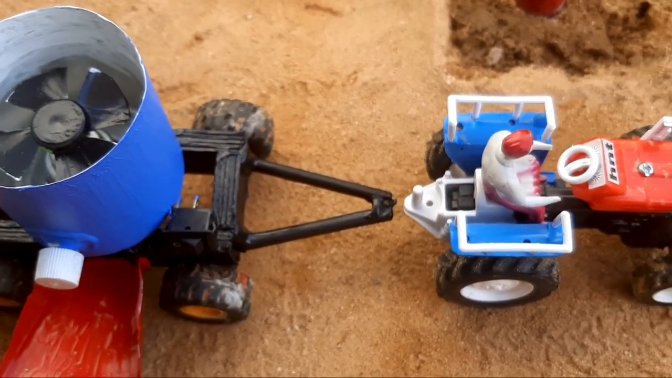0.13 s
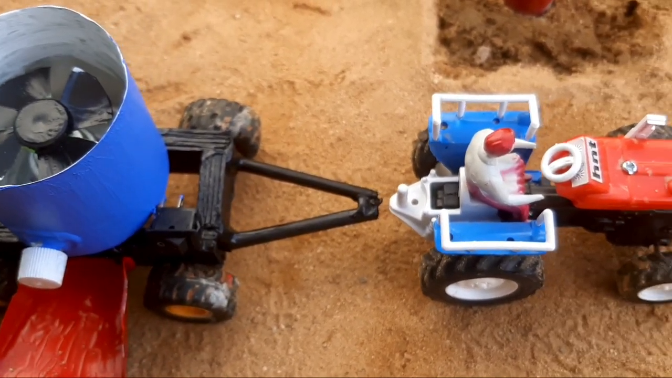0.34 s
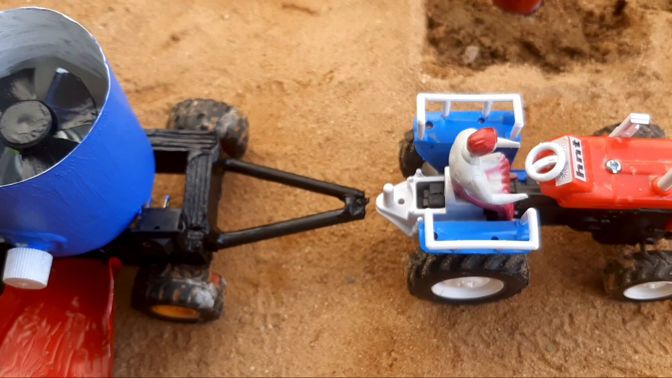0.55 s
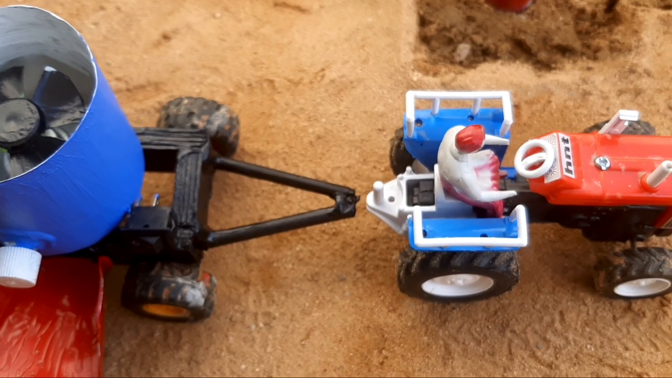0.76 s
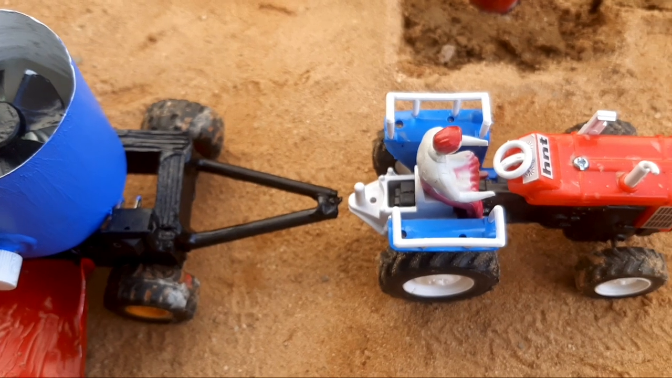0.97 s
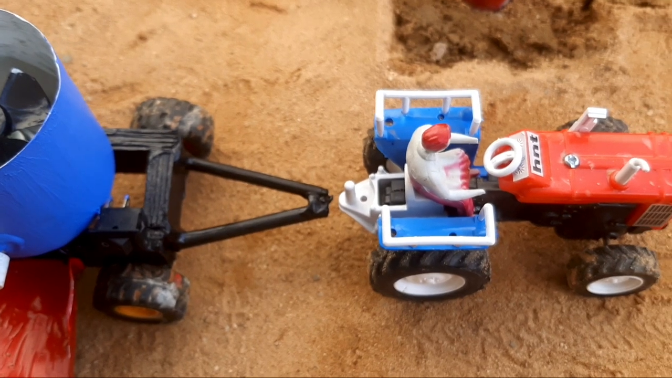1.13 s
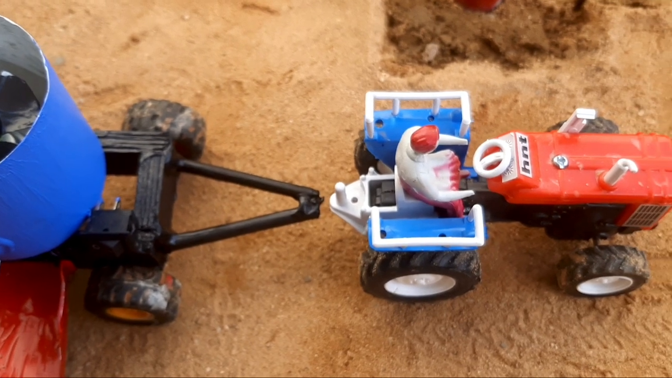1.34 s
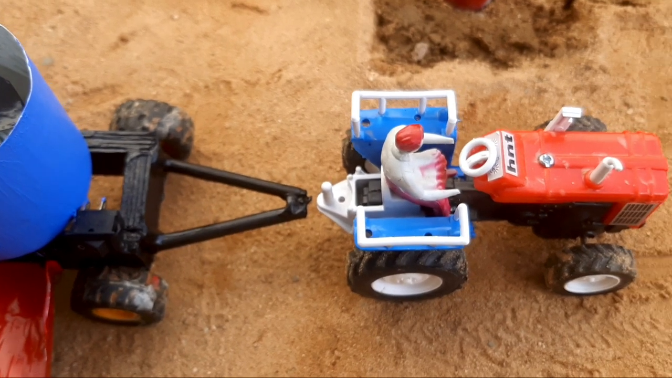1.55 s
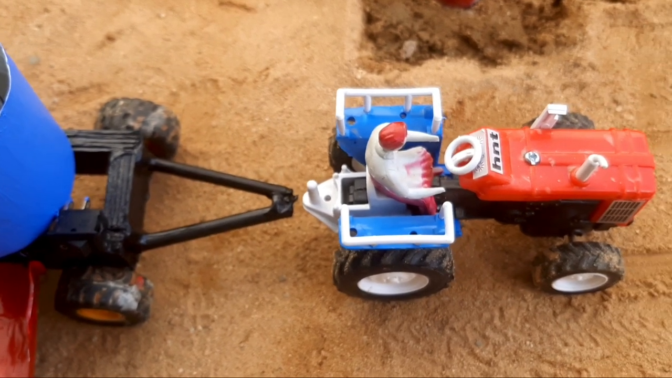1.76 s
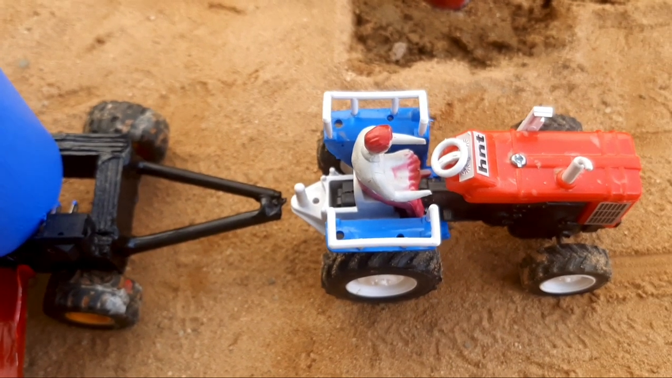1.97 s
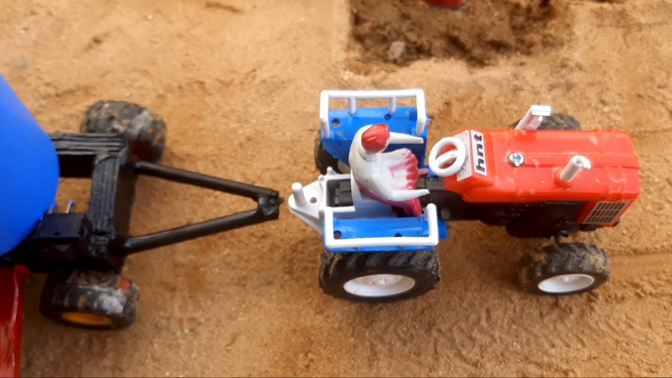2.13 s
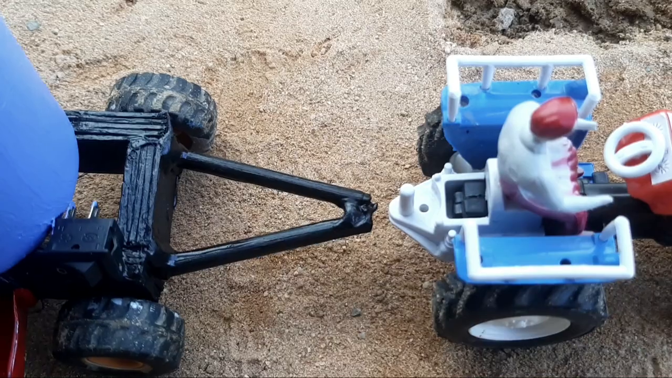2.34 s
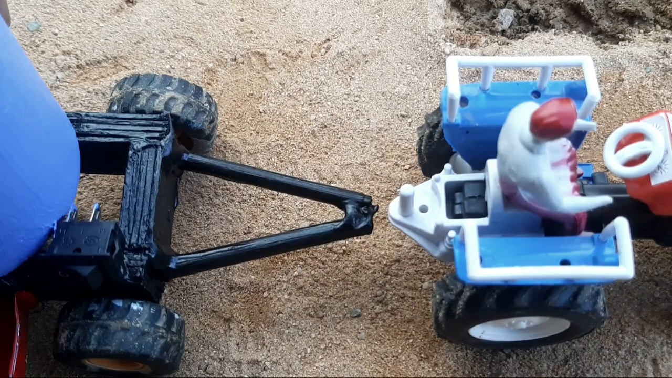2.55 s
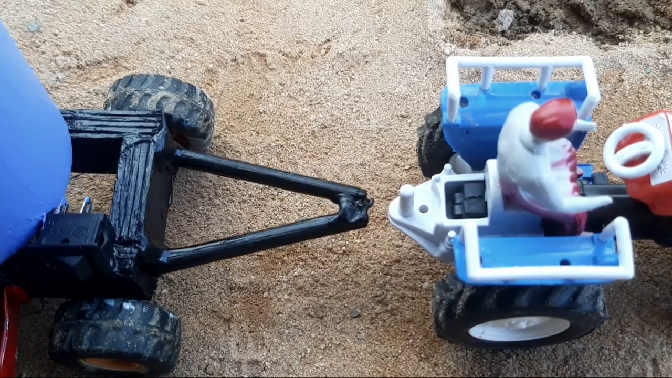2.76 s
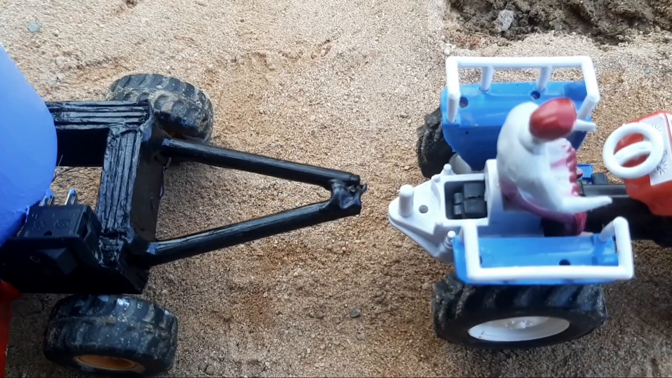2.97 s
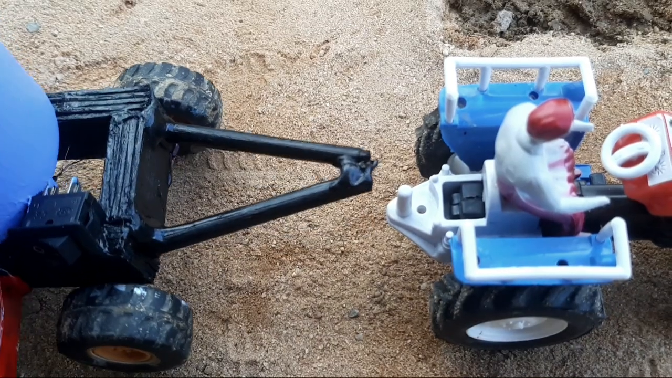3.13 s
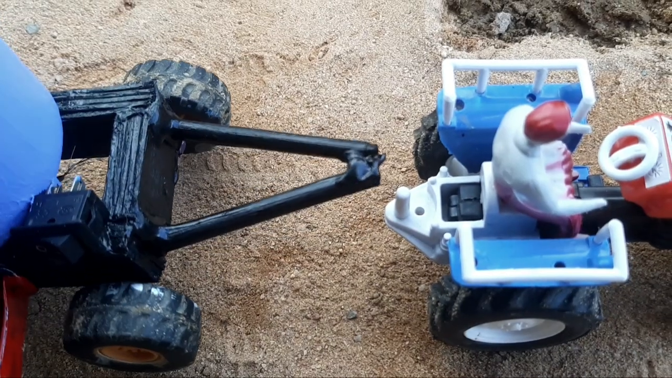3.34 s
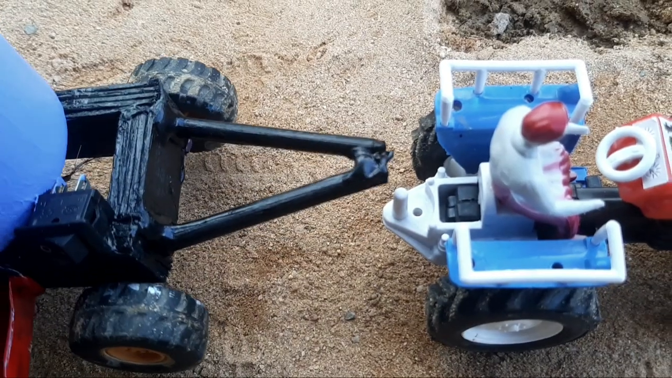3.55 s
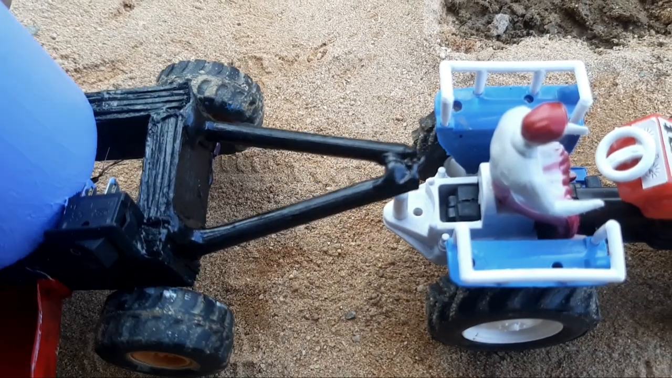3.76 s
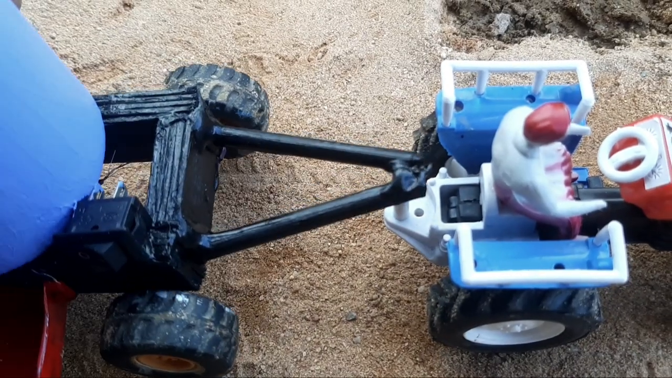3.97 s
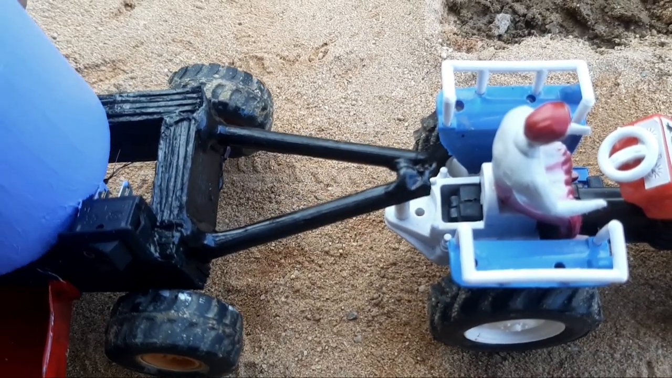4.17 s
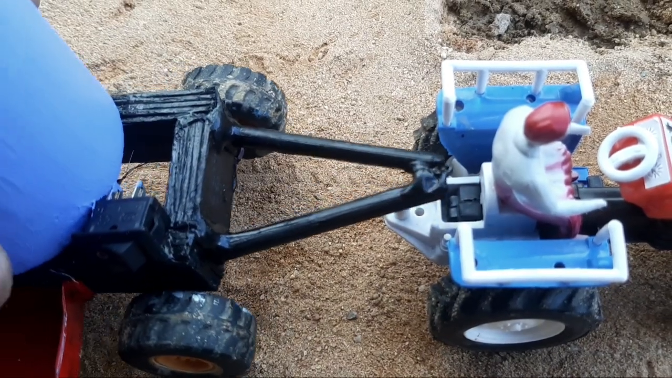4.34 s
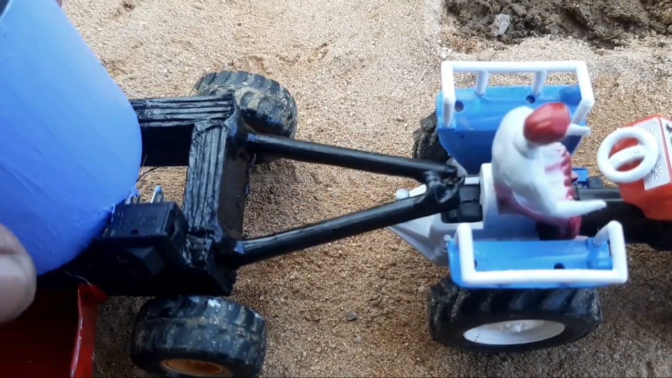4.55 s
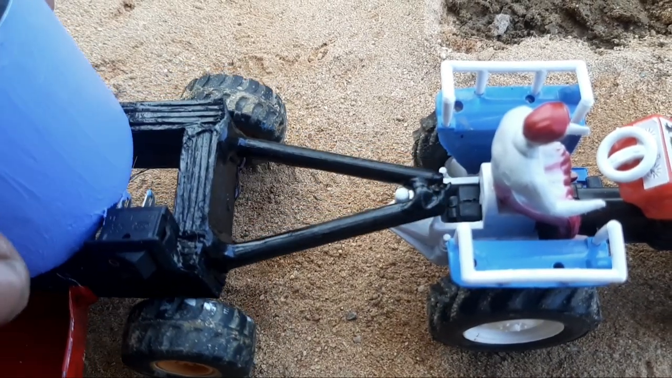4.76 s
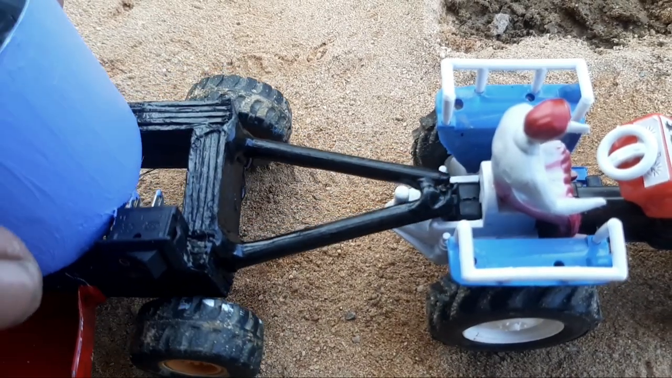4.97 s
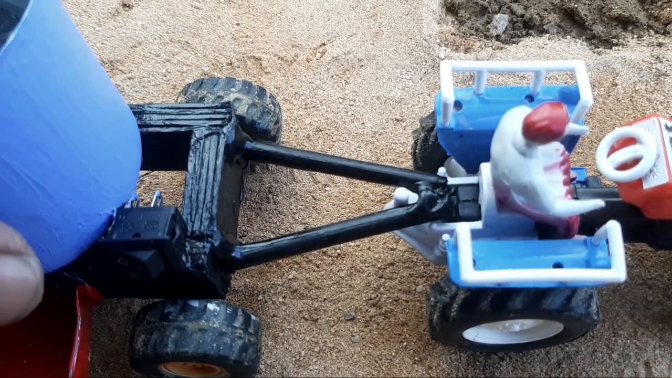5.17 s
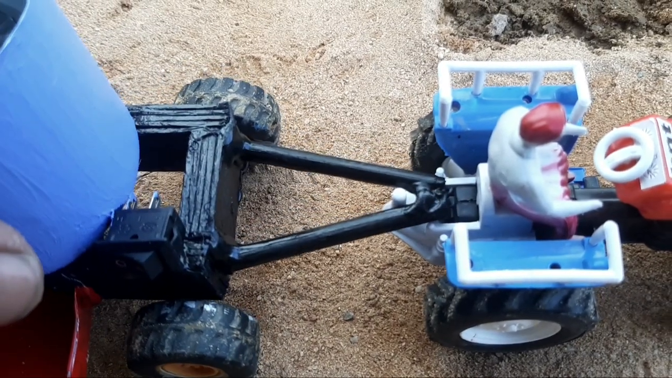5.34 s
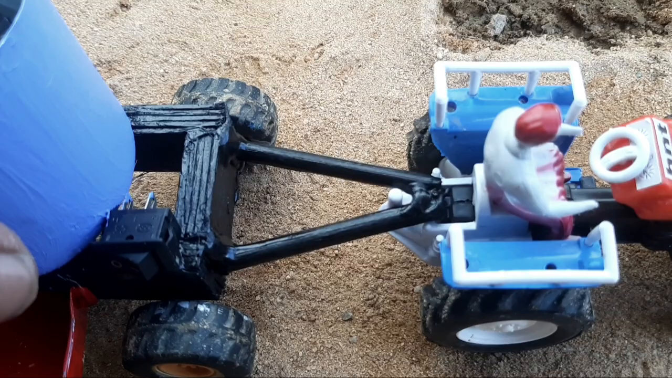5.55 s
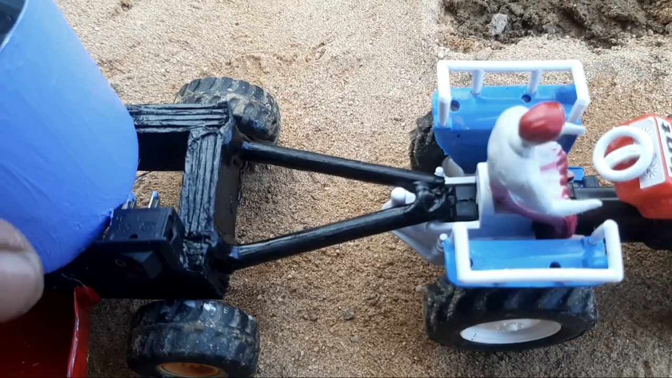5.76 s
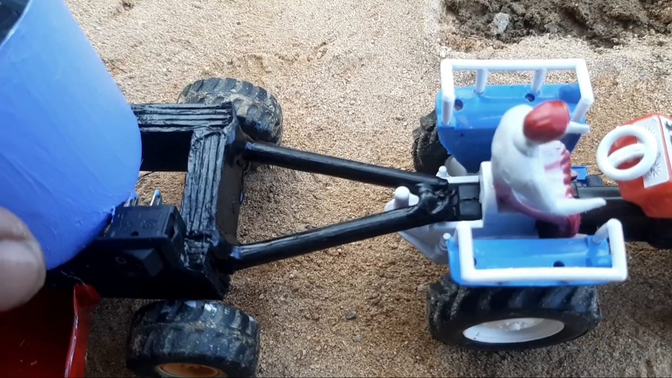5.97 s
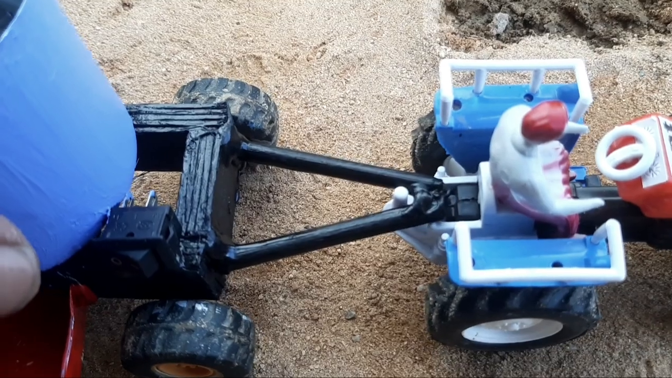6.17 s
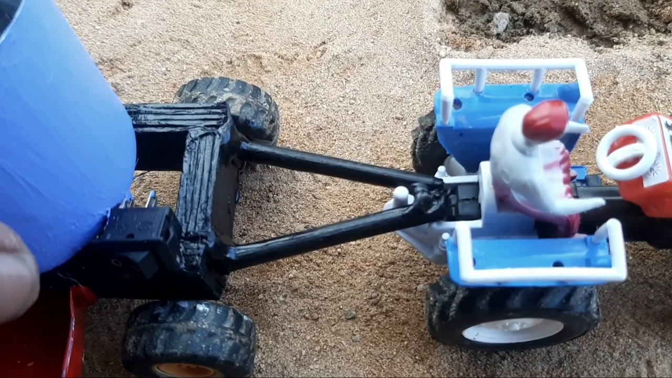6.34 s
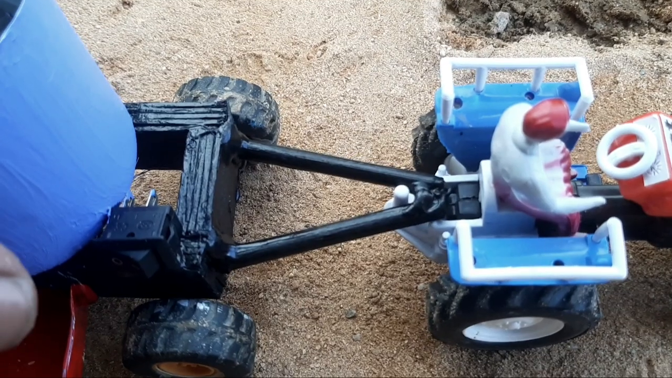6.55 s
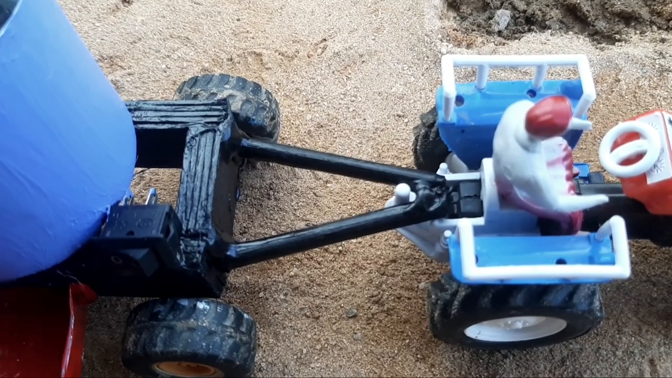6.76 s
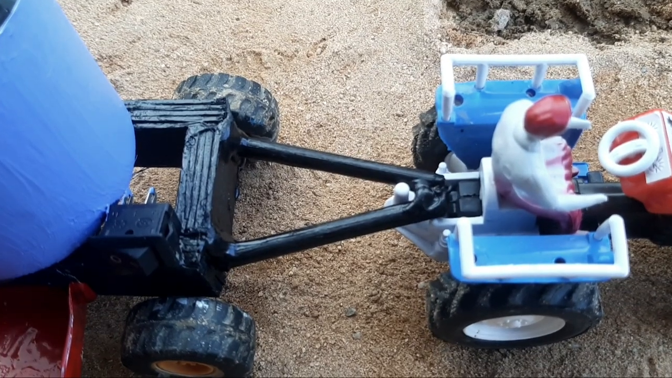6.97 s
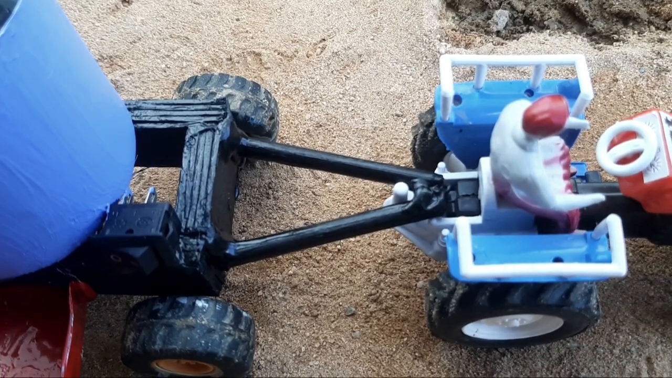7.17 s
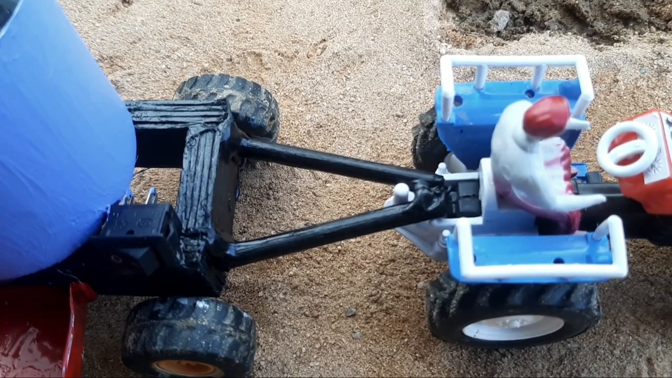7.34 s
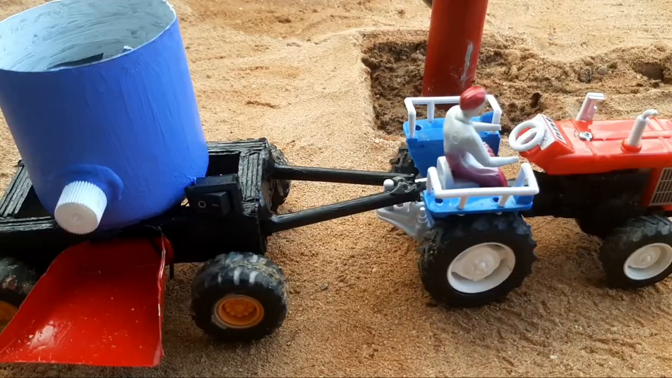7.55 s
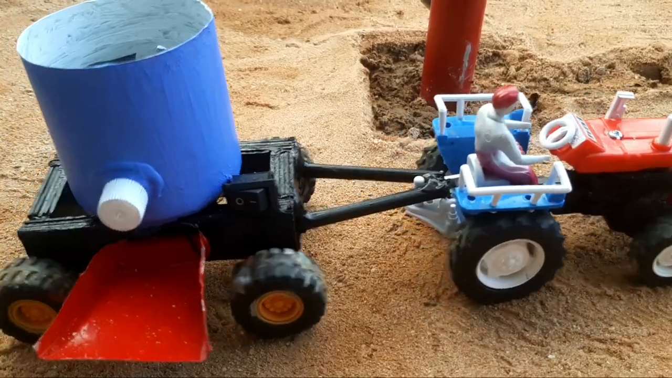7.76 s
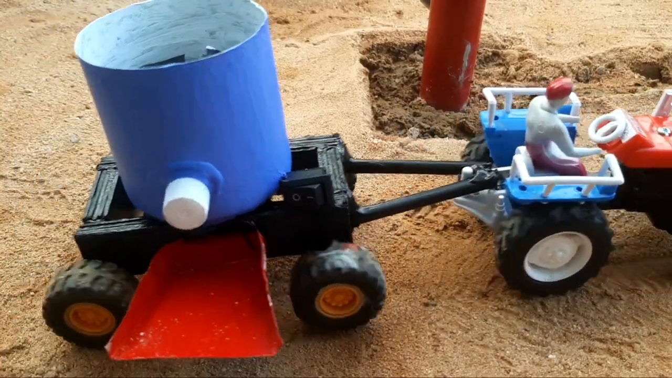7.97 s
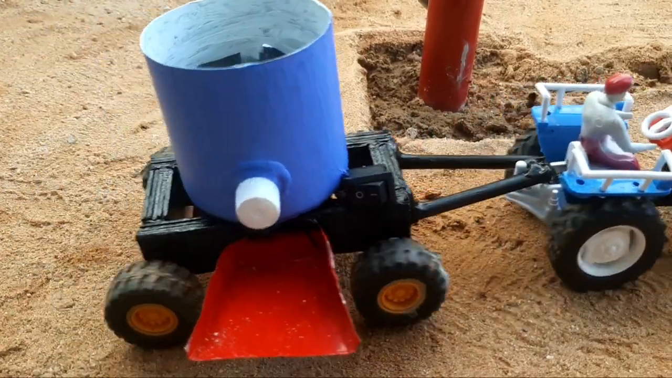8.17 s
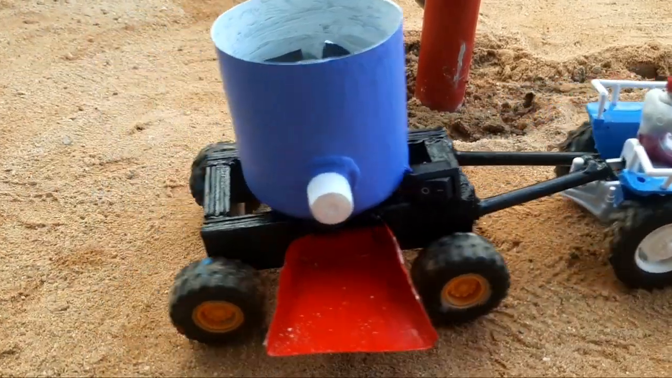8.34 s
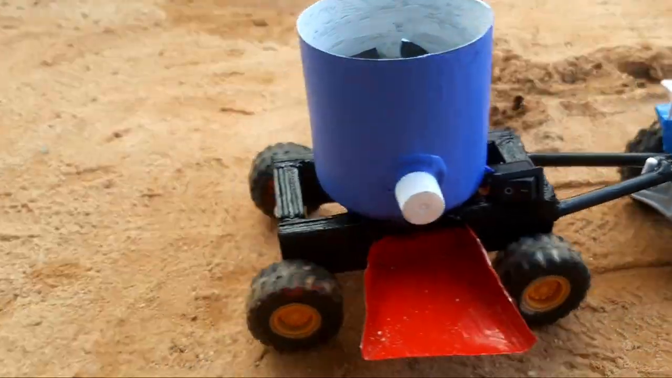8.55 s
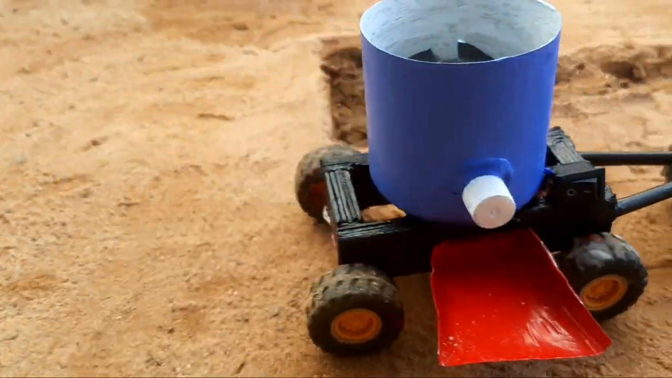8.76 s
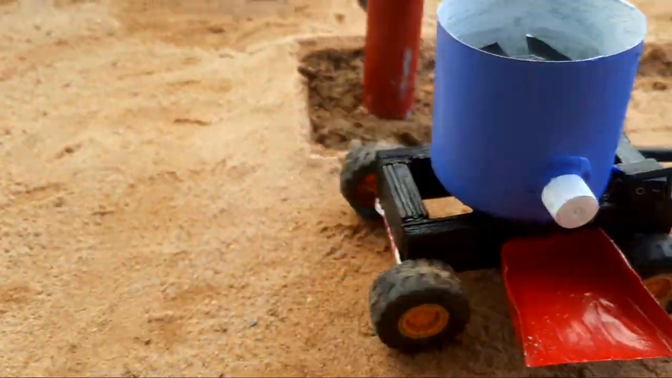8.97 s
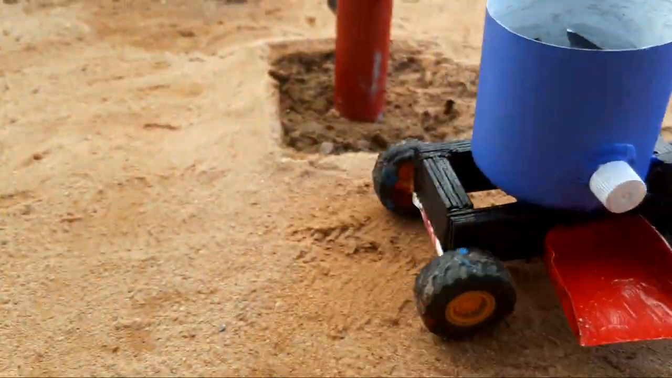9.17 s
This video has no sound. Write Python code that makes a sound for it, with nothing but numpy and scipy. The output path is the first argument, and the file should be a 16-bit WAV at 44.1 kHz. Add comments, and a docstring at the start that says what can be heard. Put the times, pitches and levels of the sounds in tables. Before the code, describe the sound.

Outdoor bird chirps with echoes, one sharp metallic clack, light clicking and scraping, then a gritty little plastic gear motor rattles and knocks off.

```python
"""Toy tractor and trailer

Sparrows chirp between far walls over a distant town: gliding tones with echoes, over filtered noise.
Close to a phone, a steel drawbar drops on sand and is wiggled onto its pin: decaying tones and noise.
Then a small geared motor jerks the load free and drives off: noise bursts, a hum and low wheel knocks.
"""
import sys
import numpy as np
from scipy import signal
from scipy.fft import rfft, irfft, next_fast_len
from scipy.io import wavfile
from scipy.ndimage import uniform_filter1d

SR = 44100
rng = np.random.default_rng(int(sys.argv[2]) if len(sys.argv) > 2 else 0)


def generate_wav(signal):
    """Clip the signal to [-1, 1] and save it as 16-bit WAV at the path in sys.argv[1]."""
    frames = np.transpose(np.atleast_2d(signal))
    scaled = np.clip(frames, -1, 1) * 32767
    pcm = np.round(scaled).astype(np.int16)
    wavfile.write(sys.argv[1], SR, pcm)


N = 406161  # length [samples]

# Town noise colour: (frequency [Hz], relative level [dB])
TOWN = [(12, -37.5), (20, -4), (83, 2.5), (130, -7), (168, -5), (193, -9.5), (301, -10.5), (472, -19.5),
        (590, -17), (1480, -21), (3530, -32), (6540, -41.5), (8410, -48), (14700, -52), (16000, -59)]
# How wide the town sounds: (frequency [Hz], side minus middle level [dB])
TOWN_SIDE = [(40, -13), (1500, -11), (8000, -5), (15000, -1.5)]
# Swelling town hiss, as wide as the rest of the town, level set on its middle part: (time [s], level [dB])
HISS = [(0, -53), (1.8, -54), (3, -52.5), (5.3, -52), (6.8, -55), (7.9, -54), (8.4, -78), (9.21, -60.5)]
RUMBLE_DB, TREBLE_DB = -44.5, -43  # the rumble drifts around its level
TOWN_LEFT_DB = 1.6  # left above right

# Notes of each bird call: (offset [s], length [s], start [Hz], middle [Hz], end [Hz], level [dB],
# roughness [0-1], share of the accent [0-1])
HIGH_CALL = [(-.058, 0.067, 5970, 5830, 5990, -53.5, 0.43, 0), (0, .03, 4350, 5150, 4150, -41, .28, 1),
             (.05, .02, 5650, 5850, 5800, -52.5, .3, 1), (.082, 0.04, 3310, 3920, 3740, -54, 0.24, 0)]
PAIR_CALL = [(0, .042, 4190, 4070, 3470, -50, 0.25, 0), (.066, 0.0232, 3090, 3477, 3320, -47, .3, 1)]
HOARSE_CALL = [(0, .09, 4170, 4413, 3960, -62, 0.81, 0.85), (.073, .065, 3195, 2986, 2980, -53, 0.464, 0)]
# When each call is sung: (time [s], level change [dB], pitch ratio, accent [dB])
HIGH = [(.035, 4.5, .99, -3), (0.517, -3, 0.98, 4), (0.981, 1, 1.013, 1), (1.695, 1, 1.01, -7),
        (2.382, 3.5, 1.01, -1.5)]
PAIRS = [(1.034, 0, 0.95, -0.36), (2.087, 0, 0.98, -0.64), (3.131, 1, 1.01, -0.76), (4.185, 0, 0.97, 1),
         (5.071, 0, 1.005, -1), (6.565, 0.74, 0.97, 1.7)]
HOARSE = [(1.24, 3.5, 1.04, 3), (1.853, -6.5, 1.01, -10), (3.057, -3, 1.01, 7), (4.355, -4, 0.98, 3.5)]
# Single whistled notes: (time [s], length [s], start [Hz], end [Hz], level [dB])
WHISTLES = [(0.501, .03, 3350, 3721, -58), (1.385, 0.027, 3300, 2900, -55), (1.943, .02, 5700, 5650, -63),
            (2.49, .01, 5640, 5500, -47), (2.778, .015, 6650, 6550, -60), (6.732, .028, 3400, 2750, -49),
            (6.85, 0.067, 4660, 3950, -58), (6.885, 0.02, 3200, 2700, -52),
            (6.917, 0.0356, 3250, 3750, -56), (6.959, 0.059, 3620, 2580, -49.5),
            (6.981, 0.034, 4350, 4280, -49.5), (7.112, 0.064, 4820, 3380, -55),
            (7.172, .03, 3380, 3320, -53), (7.238, .051, 3210, 2270, -53.5),
            (7.279, 0.027, 2260, 2250, -56), (7.362, .055, 2196, 2995, -54), (7.52, .03, 3960, 3700, -58),
            (7.55, .062, 3710, 2230, -52), (7.61, .045, 2230, 2310, -57)]
WHISTLE_ROUGH, BIRD_OCTAVE_DB = 0.19, -23.5  # roughness 0-1; overtone an octave up, against the note
WALL_S, WALL_DB = .014, -5  # echo delay and level
YARD_T60_S, YARD_DB = 0.53, -5.5  # time for the yard tail to fade by 60 dB, and its level

# Tones of the drawbar before grip and tilt: (frequency [Hz], level [dB], 60 dB fade time [s])
BAR = [(758, -20, 0.093), (1486, -17.5, 0.069), (1876, -24, 0.26), (2440, -15.5, 0.088), (2650, -12, 0.098),
       (3690, -8.5, 0.088), (4590, -11.5, 0.068), (4720, -18.5, 0.071), (4928, -3.5, 0.071),
       (6020, -22, 0.082), (6195, -7.5, 0.052), (6830, -28, 0.089), (7340, -6, 0.028), (8220, -9, 0.018),
       (9200, -19.5, 0.067), (10470, -18.5, 0.029), (11200, -32.5, 0.038), (12700, -28.5, 0.032),
       (14000, -20, 0.015)]
# The bar drops and bounces on the sand:
# (time [s], blow level [dB], crack against blow [dB], share of free ring time, thud level [dB])
DROPS = [(4.7688, -6.5, -13, 0.45, -8), (4.7744, -9, -20.5, 0.87, -50), (4.8066, -39, -3, .97, -35.5),
         (4.8735, -26, -28, 1, -17), (4.9072, -46, -4, .93, -32)]
# The bar taps its pin: (time [s], blow level [dB], crack against blow [dB], grip of the fingers [0-1])
TAPS = [(5.647, -50, 0.5, .9), (5.7166, -49, 5, .6), (5.752, -34.5, 7.5, 0.02), (5.7845, -45, -1, .7),
        (5.7952, -43, 5, .05), (5.8153, -34, 6, .6), (5.8215, -34.5, -1, 0.13), (5.8431, -22.5, 2.5, 0.17),
        (5.8619, -25, 2.5, .1), (5.904, -37.5, 14, .4), (5.914, -39, -1, .3), (5.928, -31, -13, .3),
        (5.954, -18, -8, 0.25), (5.9716, -21, -6, 0.24), (6.0048, -56, 17, .05), (6.0394, -35, -4, .15),
        (6.3158, -22, -6.5, .8)]
# The bar rubs on its pin: (time [s], length [s], level before the sag [dB])
RUBS = [(5.709, 0.033, -51.5), (5.898, 0.0527, -38.5), (6.032, 0.07, -42.5)]
# Fingers slide off the bar: (start [s], end [s], swell time [s])
FINGERS = (6.11, 6.312, .07)
DROP_TILT_DB, TAP_TILT_DB = -4, 2.5  # brightness, dB per octave
GRIP_TILT_DB, GRIP_DAMPING = 12, 0.594  # at full grip: added dB per octave, lost share of ring time
DROP_CRACK_T60_S, TAP_CRACK_T60_S = 0.036, 0.025
MODE_SCATTER_DB = 2.  # random level spread of the tones
THUD_HZ, THUD_SPREAD, THUD_T60_S = 74, .84, .17  # final pitch, size of the glide [cycles], fade time
RUB_ATTACK_S, RUB_RELEASE_S = .006, 0.0072
RUB_SAG_DB_S, RUB_RING_DB_S = -120, 120  # dB per second; ringing grows against the fading rub
RUSTLE = .45  # gain of the broad skin-and-sand noise in a rub
FINGERS_DB, FINGERS_RING_DB = -53, -9  # sliding level; ringing against the skin noise

# Motor and load: (time [s], gear noise level [dB], rolling rumble level [dB])
DRIVE = [(7.68, -61, -66), (7.904, -49, -50.5), (8.032, -42, -40), (8.122, -44.5, -46.5),
         (8.336, -39.5, -39), (8.442, -34, -33), (8.528, -35.5, -46.5), (8.88, -41, -52),
         (9.21, -38.5, -51)]
# Gear noise colour: (frequency [Hz], relative level [dB])
GEARS = [(88, -24), (150, -5), (352, -18), (643, -3), (1830, -15), (3220, -11.5), (3980, -6.5), (7130, -26),
         (10300, -28), (15500, -46.5)]
# Resonances of the plastic body: (frequency [Hz], rough width [Hz], level before width scaling [dB])
SHELL = [(552.6, 120, 8.5), (1610, 71, 9.5), (2050, 64, 2.5), (2287, 48, 10), (2848, 42, 14), (4180, 43, 7),
         (4274, 60, -6.5), (4840, 42, 5), (5440, 62, 4.5), (6310, 38, -1), (6530, 70, -0.5),
         (7670, 130, -39), (9000, 250, -26), (9900, 82, -13)]
# Motor shaft: (time [s], frequency [Hz], hum level [dB])
SHAFT = [(8.2, 29.6, -54.5), (8.346, 29.8, -44), (8.424, 31.28, -48), (8.508, 33.4, -43),
         (8.66, 34.06, -43), (8.812, 31.6, -42), (8.872, 30.2, -41), (8.976, 29, -47), (9.21, 29.3, -47)]
# Gear teeth catch as the load is jerked free: (time [s], burst level before colouring [dB])
CATCHES = [(7.8374, -43), (7.931, -41.5), (7.9792, -37.5), (8.036, -35.5), (8.0715, -41.5), (8.1652, -38.5),
           (8.2197, -34.5), (8.253, -34.5), (8.329, -36.5), (8.3709, -39), (8.3953, -36), (8.434, -37),
           (8.452, -34), (8.5039, -42), (9.193, -40)]
# Wheels jerk in the sand: (time [s], level before the fade [dB])
JERKS = [(7.882, -28), (7.965, -23), (8.008, -18), (8.057, -17), (8.099, -22.5), (8.19, -18.5),
         (8.242, -16.5), (8.276, -15), (8.347, -14.5), (8.382, -13), (8.409, -12), (8.432, -27),
         (8.443, -18), (8.46, -26), (8.726, -30)]
# One gear squeak: (time [s], length [s], edge pitch [Hz], top pitch [Hz], peak level [dB])
SQUEAK = (8.553, .034, 4600, 5150, -37)
CATCH_LOW_DB, CATCH_T60_S = 0, 0.077  # lower band against the burst; fade time
# Rolling, one tooth catches every turn of a slowing gear, with a lighter touch just ahead
TURN_START_S, TURN_S, TURN_SLOWING_S, TURN_COUNT = 8.561, .0557, .0025, 10  # slowing is added each turn
TURN_DB, TURN_LOW_DB, TURN_T60_S = -37.5, -4, 0.047
AHEAD_S, AHEAD_DB = .012, -6
RATTLE_PER_S, RATTLE_DB, RATTLE_SPREAD_DB = 220, -14.5, 2.5  # mean rate; levels against the gear noise
JERK_HZ, JERK_HZ_PER_DB = 144, 4  # pitch at -18 dB; a harder jerk sounds higher
TOP_HZ = 15900  # where the phone cuts the treble


def undb(db):
    """Turn decibels into gain."""
    return 10 ** (np.asarray(db) / 20)


def unit(x):
    """Scale to an average strength (rms) of 1."""
    return x / np.sqrt(np.mean(x ** 2))


def curve(table, column=1):
    """Draw straight lines between the rows of a table column, one value per sample."""
    table = np.array(table)
    return np.interp(np.arange(N) / SR, table[:, 0], table[:, column])


def colour(x, points):
    """Shape how loud each frequency is by (frequency [Hz], level [dB]) points."""
    hz, db = np.transpose(points)
    size = next_fast_len(N)
    bin_hz = np.arange(size // 2 + 1) * SR / size
    gain = undb(np.interp(np.log(bin_hz + 1), np.log(hz), db))
    return irfft(rfft(x, size) * gain, size)[..., :N]


def ring(x, hz, t60):
    """Let x excite one resonance that fades by 60 dB in t60 seconds."""
    pole = np.exp(2j * np.pi * hz / SR - np.log(1000) / (t60 * SR))
    return signal.lfilter([1], [1, -pole], x).imag


def walk(rate):
    """Make a random wobble from values held 1 / rate seconds and smoothed; spread near 1."""
    hold = int(SR / rate)
    steps = np.repeat(rng.standard_normal(N // hold + 1), hold)
    return 1.285 * uniform_filter1d(steps, hold)[:N]


def add(out, s, x):
    """Mix x into out from s seconds."""
    i = int(s * SR)
    out[i:i + len(x)] += x[:N - i]


def gate(start, end, rise, fall):
    """Open from 0 to 1 over rise seconds from start, and close over fall seconds before end."""
    t = np.arange(N) / SR
    return np.clip(np.minimum((t - start) / rise, (end - t) / fall), 0, 1)


def town():
    """Far rumble, a hiss that swells apart from it, and a faint steady treble, all cut from noise."""
    wide = unit(colour(rng.standard_normal((2, N)), TOWN))
    mid_side = np.array([wide[0], colour(wide[1], TOWN_SIDE)])
    rumble = colour(mid_side, [(20, -1), (400, 0.5), (700, -31.0)])
    hiss = colour(mid_side, [(300, -21.5), (500, -2.0), (2500, -5.5), (4500, -9)])
    treble = colour(mid_side, [(2000, -26.5), (3500, -3.5), (16000, -2.0)])
    mix = undb(RUMBLE_DB + 1.0 * walk(5.4)) * rumble
    mix += undb(TREBLE_DB) * treble
    mix += undb(curve(HISS)) * hiss / np.std(hiss[0])
    mid, side = mix
    return np.array([mid + side, mid - side]) * undb([[TOWN_LEFT_DB / 2], [-TOWN_LEFT_DB / 2]])


def songs():
    """List every note as (time [s], length [s], start, middle, end [Hz], level [dB], roughness)."""
    notes = [(s, length, a, (a + c) / 2, c, db, WHISTLE_ROUGH) for s, length, a, c, db in WHISTLES]
    for call, rows in [(HIGH_CALL, HIGH), (PAIR_CALL, PAIRS), (HOARSE_CALL, HOARSE)]:
        for s, change_db, ratio, accent_db in rows:
            for at, length, a, b, c, db, rough, share in call:
                early = min(s + at, 0)  # trim a note that would begin before time 0
                level_db = db + change_db + share * accent_db
                notes.append((max(s + at, 0), length + early, a * ratio, b * ratio, c * ratio,
                              level_db, rough))
    return notes


def yard():
    """Sound path of the yard: direct sound, one wall echo and a stereo tail of fading noise."""
    t = np.arange(SR) / SR
    fade = undb(-60 * t / YARD_T60_S) * np.minimum(t / .035, 1)
    tail = rng.standard_normal((2, len(t))) * fade
    mid, side = signal.lfilter(*signal.butter(2, 7000, fs=SR), tail)  # air and walls dull the tail
    mid, side = undb(YARD_DB) * np.array([mid, 0.47 * side]) / np.sqrt(np.sum(mid ** 2))
    mid[0], mid[int(WALL_S * SR)] = 1, undb(WALL_DB)
    return np.array([mid + side, mid - side])


def birds():
    """Sparrows sing gliding, nearly pure tones; rough notes shake in pitch and gain hoarse noise."""
    dry, shake, flutter = np.zeros(N), walk(700), walk(250)
    rasp_colour = [(2500, -18), (4000, 3.0), (6500, -4.5), (9500, -18), (12000, -28.5)]
    rasp = unit(colour(rng.standard_normal(N), rasp_colour))
    for s, length, a, b, c, db, rough in songs():
        u = np.linspace(0, 1, int(length * SR))  # progress through the note
        i = int(s * SR)
        span = slice(i, i + len(u))
        # a smooth bend (parabola) through the three pitches
        hz = a * (1 - u) * (1 - 2 * u) + 4 * b * u * (1 - u) + c * u * (2 * u - 1)
        phase = np.cumsum(2 * np.pi / SR * hz * (1 + 0.1294 * rough * shake[span]))
        tone = np.sin(phase) + undb(BIRD_OCTAVE_DB) * np.sin(2 * phase)
        tone += 1.5 * rough ** 2 * rasp[span]
        swell = np.sin(np.pi * u ** .65) ** .6
        add(dry, s, undb(db + 2.0 * flutter[span]) * tone * swell)
    return signal.fftconvolve(dry[None], yard(), axes=1)[:, :N]


def blows():
    """Each drop or tap rings the steel bar's tones and adds a short noisy crack."""
    out, (hz, db, t60) = np.zeros(N), np.transpose(BAR)[:, :, None]
    t = np.arange(SR // 4) / SR
    hits = [(s, level_db, DROP_TILT_DB, crack_db, DROP_CRACK_T60_S, free)
            for s, level_db, crack_db, free, _ in DROPS]
    # a tighter grip leaves brighter, shorter rings
    hits += [(s, level_db, TAP_TILT_DB + GRIP_TILT_DB * grip, crack_db, TAP_CRACK_T60_S,
              1 - GRIP_DAMPING * grip) for s, level_db, crack_db, grip in TAPS]
    chance = rng.standard_normal((len(hits), 2, len(BAR), 1))
    crack_band = signal.butter(3, [900, 9500], "band", fs=SR)
    cracks = signal.lfilter(*crack_band, rng.standard_normal((len(hits), len(t))))
    for hit, (scatter, start), crack in zip(hits, chance, cracks):
        s, level_db, tilt_db, crack_db, crack_s, free = hit
        fade_db = -60 * t / (t60 * np.clip(free, .2, 1.5))
        mode_db = db + tilt_db * np.log2(hz / 5000) + MODE_SCATTER_DB * scatter + fade_db
        modes = undb(mode_db) * np.sin(2 * np.pi * hz * t + 2 * start)
        clank = modes.sum(axis=0) + undb(crack_db) * crack * undb(-60 * t / crack_s)
        add(out, s, undb(level_db) * clank * np.minimum(t / .0004, 1))
    return out


def thuds():
    """The ground spreads each drop in time, treble first and bass late: a tone that falls fast."""
    out, t = np.zeros(N), np.arange(SR // 4) / SR
    glide_hz = THUD_HZ + THUD_SPREAD / (t + .0002) * np.exp(-t / .03)
    fade = undb(-60 * t / THUD_T60_S) + .5 * undb(-60 * t / 0.01)
    thud = np.sin(np.cumsum(2 * np.pi / SR * glide_hz)) * fade
    thud -= 0.2 * np.sin(2 * np.pi * 42 * t) * undb(-60 * t / 0.59)  # the sand heaves slowly
    for s, *_, thud_db in DROPS:
        add(out, s, undb(thud_db) * thud)
    return out


def rubbing():
    """Tiny slips of the pin and fingers make gritty noise that also rings the bar's tones."""
    out = np.zeros(N)
    grit = rng.standard_normal(N) * undb(1.9 * walk(600))
    # the bar is held, so its tones fade in half the time
    ringing = unit(sum(undb(db + 6.5 * np.log2(hz / 5000)) * ring(grit, hz, t60 / 2)
                       for hz, db, t60 in BAR))
    rustle = unit(colour(grit, [(1500, -21), (3500, 2.0), (7000, -21), (15000, -2)]))
    for s, length, level_db in RUBS:
        since = np.clip(np.arange(N) / SR - s, 0, length)
        touch = gate(s, s + length, RUB_ATTACK_S, RUB_RELEASE_S)
        touch = touch * undb(level_db + RUB_SAG_DB_S * since)
        out += touch * (RUSTLE * rustle + undb(-2 + RUB_RING_DB_S * since) * ringing)
    start, end, swell = FINGERS
    skin = unit(colour(grit, [(1500, -21), (3500, -3.0), (7000, -12), (15000, -13.5)]))
    skin = skin * undb(1.3 * walk(60))
    slide = gate(start, end, swell, .004) * undb(FINGERS_DB)
    return out + slide * (skin + undb(FINGERS_RING_DB) * ringing)


def drawbar():
    """The steel bar clanks, sends thuds through the sand and rubs on its pin."""
    return blows() + thuds() + rubbing()


def teeth(gear_db):
    """Noise bursts where gear teeth catch: under load, once a turn, and a random light rattle."""
    t, turn = np.arange(SR // 16) / SR, np.arange(TURN_COUNT)
    turns = TURN_START_S + TURN_S * turn + TURN_SLOWING_S * turn * (turn - 1) / 2
    rows = [(s, db, CATCH_LOW_DB, CATCH_T60_S) for s, db in CATCHES]
    rows += [(s - ahead, TURN_DB + db, TURN_LOW_DB, TURN_T60_S)
             for s in turns for ahead, db in [(0, 0), (AHEAD_S, AHEAD_DB)]]
    high, low = np.zeros((2, N))
    for (s, db, low_db, t60), noise in zip(rows, rng.standard_normal((len(rows), len(t)))):
        burst = undb(db) * noise * np.minimum(t / 0.0022, 1) * undb(-60 * t / t60)
        add(high, s, burst)
        add(low, s, undb(low_db) * burst)
    # loose teeth tick at random moments
    tick_db = gear_db + RATTLE_DB + RATTLE_SPREAD_DB * rng.exponential(size=N)
    ticks = (rng.random(N) < RATTLE_PER_S / SR) * undb(tick_db)
    rattle = signal.fftconvolve(ticks, undb(-60 * t / 0.013))[:N] * rng.standard_normal(N)
    bright = colour(high + rattle, [(4000, -6), (5500, 1.5), (10000, 0.5), (15000, -19)])
    return bright + colour(low + rattle, [(400, -9), (1200, 10.0), (4200, 4), (5500, -22)])


def motor():
    """Gear grit shakes the plastic body, with catching teeth and the rumble of rolling."""
    on = np.clip((np.arange(N) / SR - DRIVE[0][0]) / 0.022, 0, 1)
    grit = rng.standard_normal(N) * undb(2.0 * walk(300) + 1.0 * walk(60))
    shell = unit(sum(undb(db) * unit(ring(grit, hz, 2.59 / width)) * np.sqrt(width)
                     for hz, width, db in SHELL))
    gears = undb(curve(DRIVE)) * (unit(colour(grit, GEARS)) + undb(-6.5) * shell)
    # the same grit played backwards, so it does not move in step with the gears
    rolling = unit(colour(grit[::-1], [(100, -27.0), (200, 13), (600, 6.5), (1300, -41)]))
    rolling = undb(curve(DRIVE, column=2)) * rolling
    return on * (gears + rolling + teeth(curve(DRIVE)))


def shaft():
    """The turning shaft hums at its turning rate and at twice that rate."""
    turn = np.cumsum(2 * np.pi / SR * curve(SHAFT))
    on = np.clip((np.arange(N) / SR - SHAFT[0][0]) / 0.16, 0, 1)
    tones = np.sin(turn) + undb(-2.5) * np.sin(2 * turn)
    return undb(curve(SHAFT, column=2)) * on * np.sqrt(2) * tones


def wheel_jerks():
    """Each jerk of the wheels in the sand is a short low knock with two overtones."""
    out, t = np.zeros(N), np.arange(SR // 16) / SR
    for s, db in JERKS:
        hz = JERK_HZ + JERK_HZ_PER_DB * (db + 18)
        body = np.sin(2 * np.pi * hz * t)
        body += 0.58 * np.sin(2 * np.pi * 2.96 * hz * t) * undb(-60 * t / 0.068)
        body += 0.515 * np.sin(2 * np.pi * 4.24 * hz * t) * undb(-60 * t / 0.052)
        add(out, s, undb(db) * body * np.minimum(t / 0.0028, 1) * undb(-60 * t / 0.037))
    return out


def squeak():
    """One gear squeak: a shaky tone that rises and falls in both pitch and level."""
    out = np.zeros(N)
    s, length, edge_hz, top_hz, db = SQUEAK
    arch = np.sin(np.pi * np.linspace(0, 1, int(length * SR)))
    hz = (edge_hz + (top_hz - edge_hz) * arch) * (1 + 0.028 * walk(540)[:len(arch)])
    add(out, s, undb(db) * arch * np.sin(np.cumsum(2 * np.pi / SR * hz)))
    return out


def tractor():
    """The toy drives off with motor noise, shaft hum, wheel jerks and a squeak."""
    return motor() + shaft() + wheel_jerks() + squeak()


def scene():
    """The near toys sit in the centre; town and birds are wider."""
    return town() + birds() + drawbar() + tractor()


def record(dry):
    """The phone rounds the loudest peaks and cuts the top."""
    rounded = .85 * np.tanh(dry / .85)
    return signal.sosfilt(signal.ellip(12, .2, 100, TOP_HZ, fs=SR, output="sos"), rounded)


dry = scene()
out = record(dry)
generate_wav(out)
```